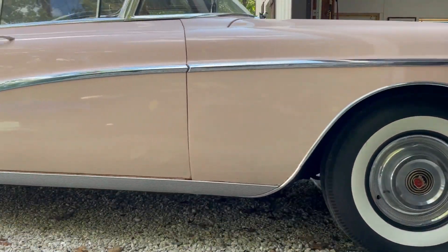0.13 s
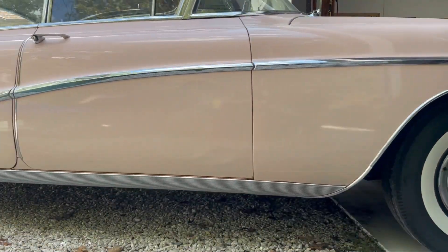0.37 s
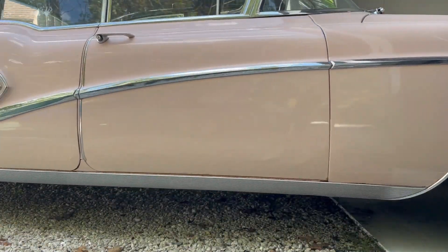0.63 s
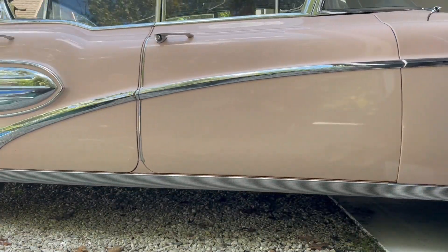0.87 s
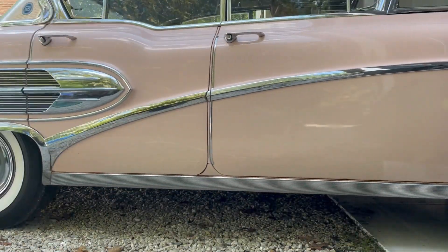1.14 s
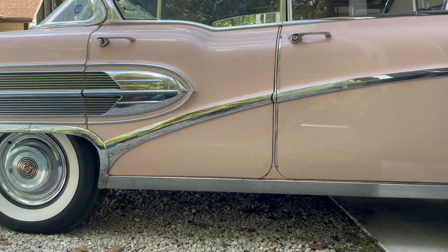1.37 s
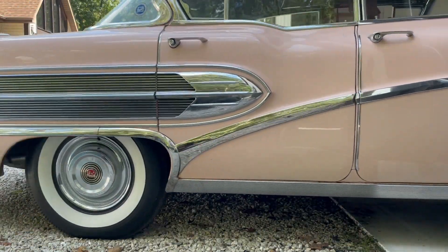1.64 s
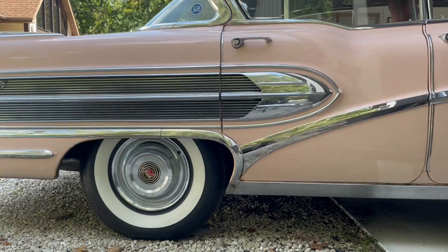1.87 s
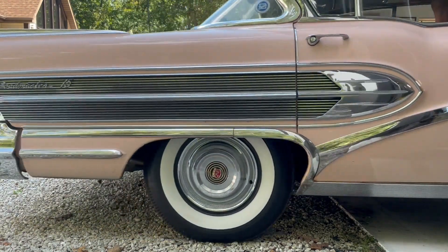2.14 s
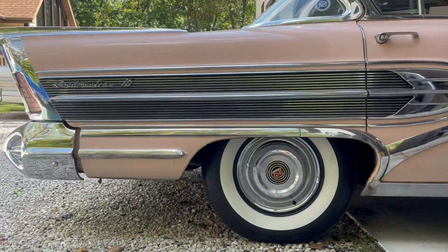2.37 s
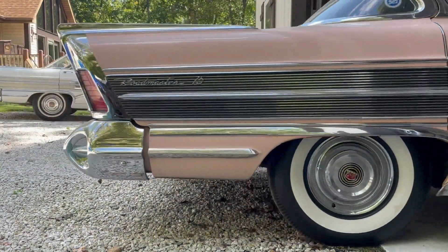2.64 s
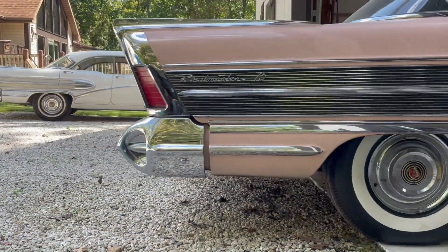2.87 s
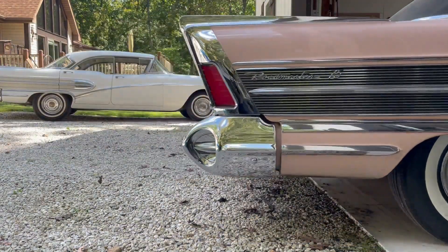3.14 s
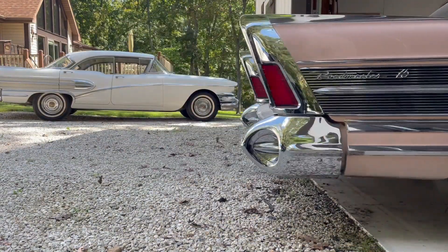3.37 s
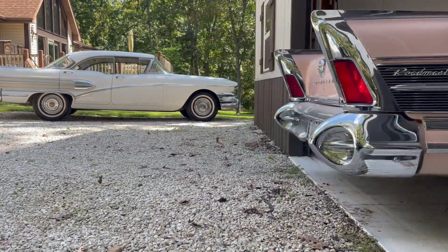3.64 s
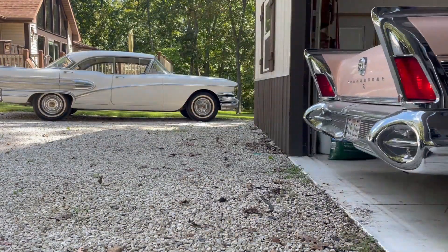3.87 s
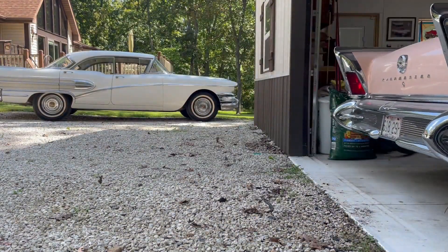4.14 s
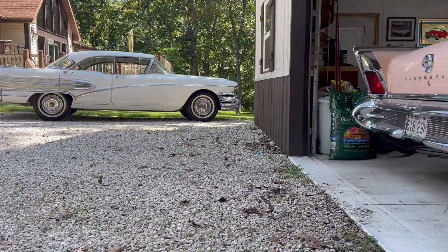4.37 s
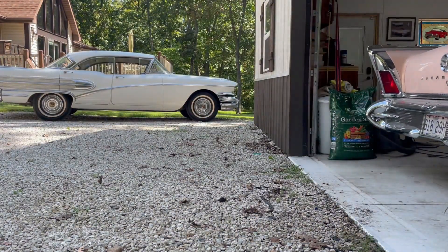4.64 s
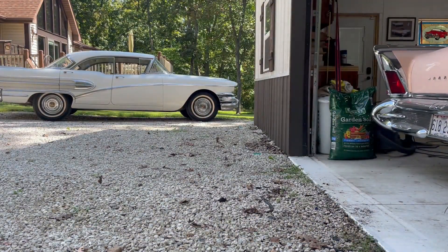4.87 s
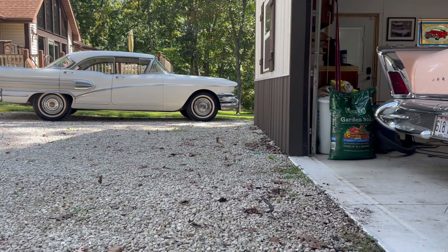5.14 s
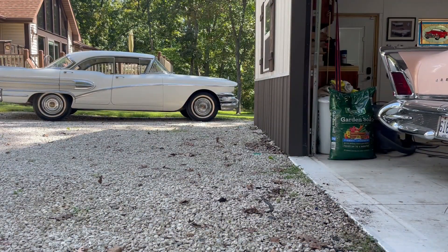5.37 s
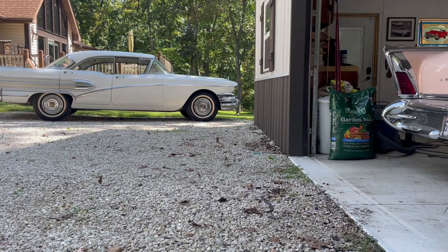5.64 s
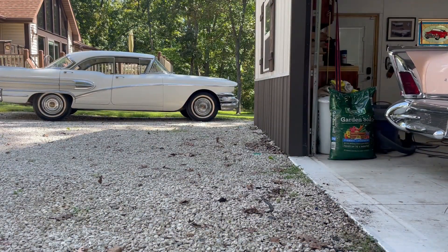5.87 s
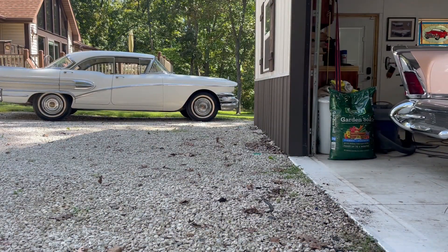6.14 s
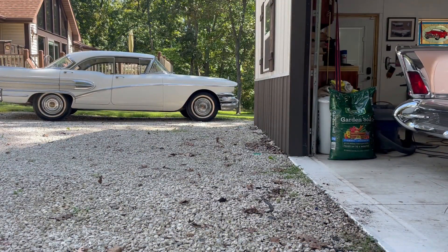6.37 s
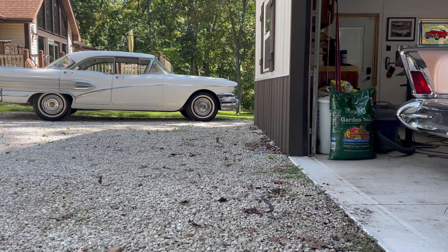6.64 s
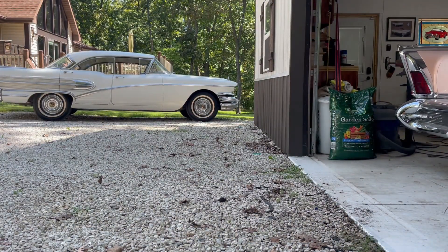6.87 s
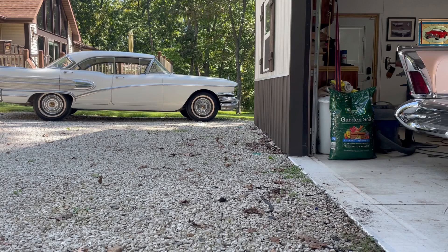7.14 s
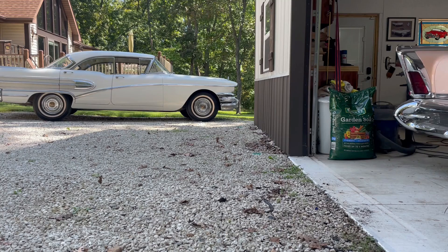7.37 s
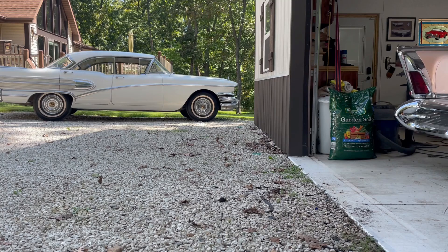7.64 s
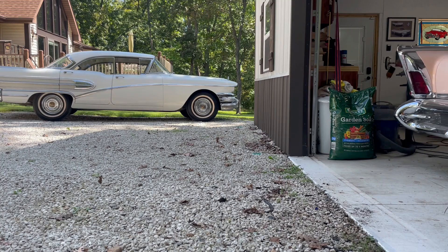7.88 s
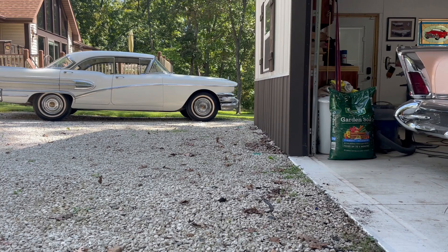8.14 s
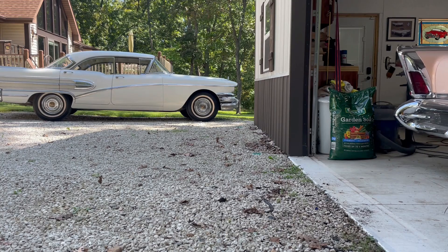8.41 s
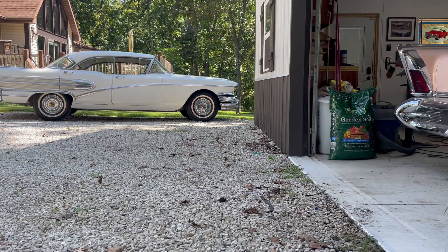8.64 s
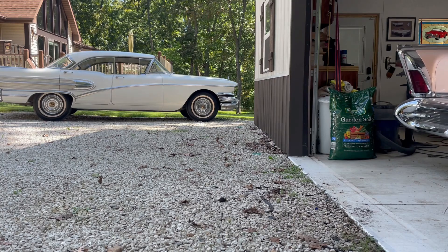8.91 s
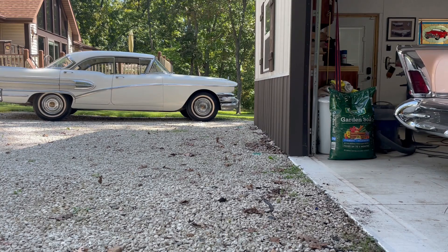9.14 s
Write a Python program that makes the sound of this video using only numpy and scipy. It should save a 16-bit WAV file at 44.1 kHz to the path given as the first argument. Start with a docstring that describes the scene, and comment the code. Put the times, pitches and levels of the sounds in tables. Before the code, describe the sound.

From 0 s a large V8 is already running very close, creeping over gravel: a deep, lumpy throb near 40 pulses a second, with a loping eight-beat unevenness, low pipe ring and broad rushing air. Around 0.5-1.5 s a leaking joint blows and spits in soft puffs, while faint crunch and small stone knocks tick under the tyres, the clearest near 1.6 s. From 2.5 to 3.5 s the tail passes; the engine-bay rush drops, the low exhaust throb swells, and short breathy chirps begin. A little more gravel crunches and knocks at 3.4-4.0 s, then fades. From 4 s the car idles in the garage, a steady heavy rumble with light exhaust hiss and irregular high whistling chirps, the speed hunting slightly. Around 7.2-8 s the revs lift a little and hold, fuller and smoother, to the end at about 9.3 s. Close stereo, short dense reflections.

```python
"""A gravel drive before an open garage: a large V8 creeps close past the microphone and idles inside.
Low orders of the firing rate throb, the two banks beat unevenly through silencer resonances, the tailpipe rings.
A leak adds breathy whistles and short chirps as the cylinders fire; a manifold joint blows and spits.
Shaped noise is the engine-bay rush and short decaying tones are the stones; both fade as the tail draws away."""
import sys
import numpy as np
from scipy import signal
from scipy.fft import rfft, irfft, next_fast_len
from scipy.io import wavfile
from scipy.ndimage import uniform_filter1d, map_coordinates

SR = 44100
rng = np.random.default_rng(int(sys.argv[2]) if len(sys.argv) > 2 else 0)


def dump(signal):
    """Clip the signal to [-1, 1] and save it as 16-bit WAV at the path in sys.argv[1]."""
    limited = np.clip(np.atleast_2d(signal).T, -1, 1)
    pcm = np.round(limited * 32767).astype(np.int16)
    wavfile.write(sys.argv[1], SR, pcm)


def boost_factor(decibels):
    """Convert a level in decibels to a linear amplitude factor."""
    exponent = np.asarray(decibels, float) / 20
    return 10 ** exponent


N = 408807

# Engine speed as the idle hunts, stumbles and is blipped up: (time [s], rate [firings per second])
SPEED = [(0.0, 42.66), (0.21, 39.17), (0.51, 41.73), (0.8, 39.58), (1.01, 42.54), (1.19, 41.21),
         (1.44, 42.81), (1.75, 39.96), (2.2, 39.95), (2.56, 41.79), (2.75, 41.03), (3.15, 42.6),
         (3.38, 40.11), (3.67, 43.52), (4.13, 42.28), (4.44, 43.72), (4.65, 40.54), (5.38, 42.0),
         (5.65, 41.36), (5.87, 42.76), (6.03, 41.57), (6.28, 42.47), (6.59, 40.96), (6.82, 44.2),
         (7.16, 41.87), (8.04, 46.08), (8.33, 45.06), (8.6, 46.12), (9.27, 45.62)]
# Each cylinder in firing order, relative strengths: (leak chirp [dB], puff of the rush [dB])
CYLINDER = [(-10, -7), (-2, 0), (0, 4), (-8, -3), (-2, -2), (-4, -2), (-4, -4), (-1, -4)]


def unit(x):
    """Scales to an rms of 1."""
    return x / np.sqrt(np.mean(x ** 2) + 1e-20)


def along(points, hz):
    """Reads (Hz, value) points on a log frequency axis."""
    f, v = np.transpose(points)
    return np.interp(np.log(hz + 1), np.log(f + 1), v)


def curves(rows):
    """One value per sample for each column after the time."""
    s, *cols = np.transpose(rows)
    return [np.interp(np.arange(N) / SR, s, c) for c in cols]


def filtered(x, response):
    """Multiplies the spectrum of x by a response of frequency."""
    m = next_fast_len(N + SR // 2)
    return irfft(rfft(x, m) * response(np.fft.rfftfreq(m, 1 / SR)), m)[..., :N]


def resonant(x, modes):
    """Sends x through parallel (Hz, width Hz, dB) resonances of alternating sign."""
    def response(f):
        total = 0
        for k, (centre, width, db) in enumerate(modes):
            damping = 1j * f * width
            total = total + (-1) ** k * boost_factor(db) * damping / (centre * centre - f * f + damping)
        return total
    return filtered(x, response)


def burst(rise, t60):
    """A soft swell that dies away by 60 dB in t60 seconds, with its time axis."""
    t = np.arange(SR // 16) / SR
    return t, (1 - np.exp(-t / rise)) * boost_factor(-60 * t / t60)


def crank():
    """Firings counted so far: the running sum of the engine speed."""
    return np.cumsum(curves(SPEED)[0]) / SR


def firings(late, sizes, scatter_db):
    """One spike per firing, late by a share of a stroke, sized by cylinder, no two alike."""
    turn = crank() - late
    at = np.flatnonzero(np.diff(np.floor(turn))) + 1
    cylinder = np.floor(turn[at]).astype(int) % 8
    spikes = np.zeros(N)
    spikes[at] = np.asarray(sizes)[cylinder] * boost_factor(scatter_db * rng.standard_normal(len(at)))
    return spikes


def scattered(x):
    """What ground, car body and garage walls send back: a short dense tail of decaying noise."""
    t = np.arange(SR // 8) / SR
    tail = rng.standard_normal(len(t)) * boost_factor(-60 * t / 0.066)
    echo = signal.fftconvolve(x, tail / np.linalg.norm(tail))[:N]
    return filtered(echo, lambda hz: 1 / (1 + (110 / (hz + 1)) ** 4))


def rush(spectrum, patchy_db):
    """Turbulent noise of rms 1, with patches of random gain in time and pitch."""
    z = signal.stft(rng.standard_normal(N), nperseg=512)[2]
    field = uniform_filter1d(rng.standard_normal(z.shape), size=8, axis=0)
    field = uniform_filter1d(field, size=4, axis=1)
    noise = signal.istft(z * boost_factor(patchy_db * unit(field)), nperseg=512)[1][:N]
    return unit(filtered(noise, lambda hz: boost_factor(along(spectrum, hz))))


def gas(beside_db, behind_db):
    """Two unrelated streams of rushing gas and fan air; the treble puffs with every firing."""
    # Shapes of the rush, beside the body and behind the tail: (frequency [Hz], relative density [dB per Hz])
    beside = [(30, -63), (40, 2.5), (60, -5.5), (100, -2), (150, -7.5), (250, -12.5), (450, -19.5),
              (900, -25), (1800, -32), (3000, -37), (5000, -36.5), (7000, -37), (8500, -43), (10500, -41),
              (13500, -45.5), (14500, -88)]
    behind = [(30, -57), (40, -0.5), (60, -3.5), (100, -7), (150, -13), (250, -9.5), (450, -18.5),
              (900, -22.5), (1800, -27.5), (3000, -32.5), (5000, -36), (7000, -34.5), (8500, -36.5),
              (10500, -41.5), (13500, -53), (14500, -67)]
    # Air spaces under the car that colour the rush: (frequency [Hz], width [Hz], level [dB])
    hollow = [(423.3, 38, -3), (699, 33, -4.5)]
    puff_sizes = boost_factor(np.transpose(CYLINDER)[1])
    puffs = signal.fftconvolve(firings(.45, puff_sizes, scatter_db=1.8), burst(.004, .06)[1])[:N]
    streams = []
    for _ in range(2):
        near = boost_factor(beside_db) * rush(beside, patchy_db=2.5)
        far = boost_factor(behind_db) * rush(behind, patchy_db=1.42)
        streams.append(near + far)
    air = np.array(streams)
    air = air + sum(resonant(air, [mode]) for mode in hollow)
    treble = filtered(air, lambda hz: 1 / (1 + (1600 / (hz + 1)) ** 2))
    return air - treble + treble * unit(2.17 + unit(puffs))


def rolling():
    """Level of the crunch: full while a wheel is on gravel, rising before and fading after."""
    # Wheels rolling on gravel: (start [s], end [s], level [dB])
    wheels = [(.2, 2.6, -49), (3.62, 4, -37.5)]
    fade_db_per_s = 16
    t = np.arange(N) / SR
    levels = []
    for start, end, db in wheels:
        time_away = np.maximum(0, np.maximum(start - t, t - end))
        levels.append(db - fade_db_per_s * time_away)
    return np.max(levels, axis=0)


def stones(crunch_db, count=6000):
    """Gravel shifts under the tyres: short grains, each of its own pitch; a few stones pop out with a knock."""
    # Stones under the tyres: (time [s], level before a common lift [dB], pitch [Hz], crack [0-1])
    knocks = [(0.222, -16, 740, 0.4), (0.283, -20, 740, 0.3), (0.635, -26, 711, 0.4),
              (0.838, -17, 1870, 0.1), (1.169, -18, 816, 0), (1.206, -19, 890, 0.3),
              (1.422, -16.5, 825, 0.2), (1.46, -23, 845, 0.5), (1.602, -10, 884, 0.83),
              (3.397, -32, 1650, 0.3), (3.633, -22, 830, 1), (3.657, -24, 1240, 0.5),
              (4.025, -22, 910, 0.4)]
    when, pitch = rng.random(count), rng.standard_normal(count)
    size = np.minimum(rng.exponential(size=count), 3)
    hz = np.clip(1700 * np.exp(.75 * pitch), 500, 12000)[:, None]
    life = np.arange(700) / SR
    envelope = boost_factor(4.0 * size[:, None] - 60 * life * hz / 22) * (1 - np.exp(-life * hz / 1.5))
    grains = envelope * np.sin(2 * np.pi * hz * life)
    places = (when * N).astype(int)[:, None] + np.arange(700)
    crunch = np.bincount(places.ravel(), grains.ravel(), N + SR)[:N]

    t, swell = burst(0.002, 0.021)
    pops = np.zeros(N + SR)
    for s, db, hz, crack in knocks:
        # the crack is inharmonic overtones and a breath of noise
        overtones = 1.03 * rng.standard_normal(len(t)) * swell
        for ratio, gain in [(1.21, 1), (1.5, 0.78), (1.87, 0.36)]:
            overtones = overtones + gain * np.sin(2 * np.pi * ratio * hz * t)
        knock = np.sin(2 * np.pi * hz * t) + np.clip(crack, 0, 1) * overtones
        pops[round(s * SR):][:len(t)] += boost_factor(db + 4.5) * swell * knock
    return boost_factor(crunch_db) * unit(crunch) + pops[:N]


def manifold():
    """The cylinders blow unequally through a manifold joint: a soft suck of air with a spit of hiss."""
    # Blow of each cylinder at the joint, in firing order: relative strength [dB]
    blow_sizes = [-5, -20, -14, 0, -18, -16, -10, -16]
    # The joint as heard at the microphone: (time [s], blow [dB], delay behind the firing [strokes])
    front = [(0, -32.5, 0.92), (.5, -25, 0.98), (1.0, -23.5, .95), (1.5, -32, 1.14), (2.0, -31, 1.42),
             (2.5, -42, 1.7), (3.0, -36.5, 1.72), (9.27, -61, 1.84)]
    blow_db, late = curves(front)
    blows = firings(late, boost_factor(blow_sizes), scatter_db=1.5)
    thump = -resonant(blows, [(122, 71, 0)])
    thump = filtered(thump, lambda hz: 1 / (1 + (60 / (hz + 1)) ** 6) / (1 + (hz / 200) ** 4))
    hiss = resonant(rng.standard_normal(N), [(1990, 250, 15.5), (6160, 3800, 4.5), (9440, 2500, 10.5)])
    spit = signal.fftconvolve(blows, burst(0.006, 0.042)[1])[:N] * hiss
    return boost_factor(blow_db) * (unit(thump) + boost_factor(-17.0) * unit(spit))


def leak():
    """Gas whistles briefly and breathily through a crack as cylinders fire, each tone of wandering strength."""
    # Whistle tones of the crack: (frequency [Hz], width [Hz], relative level [dB])
    tones = [(1620, 80, -6), (1940, 95, -6), (2250, 120, -7), (3140, 170, 0), (3920, 260, -2),
             (4740, 300, 1), (5500, 300, -7)]
    # Strength of the whistles: (time [s], top whistle [dB], lower whistles against it [dB])
    overblow = [(1.2, -72, -5), (2.6, -59, 0), (3.3, -57, 2), (4.0, -51, 0), (5.0, -48, -2.5),
                (5.7, -48.5, -2), (6.0, -54, 3), (6.6, -49.5, -2), (9.27, -49.5, -2)]
    # Loudest chirps: (time [s], low whistle [dB], high whistle [dB])
    chirps = [(2.699, -24, -19), (2.8924, -21.5, -25), (3.275, -23, -22), (3.3243, -23, -31),
              (3.444, -27, -18.5), (4.0045, -27, -19), (4.027, -17, -18), (4.193, -39, -16),
              (4.2164, -23, -18), (4.377, -34, -22), (4.4293, -18, -46), (4.4987, -24, -45),
              (4.591, -28, -18.5), (4.938, -21, -38), (5.7776, -20, -26), (6.0144, -30, -26),
              (6.0377, -18, -37), (6.086, -17, -42), (6.156, -22, -23), (6.3944, -22, -40),
              (6.5893, -32.5, -19.5), (7.0283, -23, -28), (7.1, -20, -29), (7.357, -19, -23),
              (7.541, -40, -19), (7.899, -27, -21), (8.0739, -35, -25), (8.359, -35, -21),
              (8.4267, -25, -23), (9.0307, -38, -24), (9.123, -40, -23)]
    wander_db, wander_rate = 2, 10  # depth [dB], changes a second
    low_hz, high_hz = tones[3][0], tones[5][0]
    t, swell = burst(.003, .045)
    top_db, lower_db = curves(overblow)
    sizes = boost_factor(np.transpose(CYLINDER)[0])
    steady = 0
    for hz, width, db in tones:
        narrow = resonant(rng.standard_normal(N), [(hz, width, 0)])
        breathy = unit(resonant(narrow, [(hz, 2 * width, 0)]))
        gusts = .3 + unit(signal.fftconvolve(firings(.5, sizes, scatter_db=2.5), swell)[:N])
        targets = rng.standard_normal(int(N * wander_rate / SR) + 4)
        wander = map_coordinates(targets, [np.arange(N) * wander_rate / SR])
        level_db = wander_db * wander + db + top_db + lower_db * (hz < high_hz)
        steady = steady + boost_factor(level_db) * breathy * gusts

    loud = np.zeros(N + SR)
    t, swell = burst(0.0028, 0.027)
    for s, low_db, high_db in chirps:
        bend = 1 + 0.014 * rng.standard_normal()  # each chirp a little off pitch
        low = np.sin(2 * np.pi * bend * low_hz * t)
        high = np.sin(2 * np.pi * bend * high_hz * t)
        loud[round(s * SR):][:len(t)] += swell * (boost_factor(low_db) * low + boost_factor(high_db) * high)
    return steady + loud[:N]


def tailpipe(ring_db, pipe_hz):
    """One cylinder restarts the pipe's ring each cycle; the others feed or damp it."""
    # Ring stroke by stroke after the cylinder that restarts it: relative level [dB]
    stroke_db = [6, -3.5, 0, 0, -1.5, -5.5, -9.5, -9]
    turn = crank() - 2.7
    cycle = np.floor(turn / 8).astype(int) + 1
    start = np.maximum.accumulate(np.where(np.diff(cycle, prepend=0) > 0, np.arange(N), 0))
    luck = rng.standard_normal((cycle[-1] + 1, 8))
    sizes = (np.array(stroke_db) + 2.1 * luck).ravel()
    size_db = np.interp(turn + 8, np.arange(luck.size), sizes)
    hz = pipe_hz * (1 + 0.007 * luck[cycle, 0])
    ring = boost_factor(size_db) * np.sin(2 * np.pi * hz * (np.arange(N) - start) / SR)
    return boost_factor(ring_db) * unit(resonant(ring, [(pipe_hz, 70, 0)]))


def banks(beat_db):
    """The banks push with opposite bias, so the silencer lopes once every eight firings."""
    # Bias of each cylinder on the silencer, in firing order: push [signed, relative]
    push = [-1.63, 0.75, 1.56, -1.3, 0.98, -0.32, -1.25, 0.48]
    # Resonances of the silencer: (frequency [Hz], width [Hz], relative level [dB])
    silencer = [(53.5, 18, -5.5), (74, 24.6, 0), (102.4, 17.5, -5), (138.5, 20, -7.5)]
    beat = resonant(firings(0.29, push, scatter_db=2.5), silencer)
    beat = filtered(beat, lambda hz: 1 / (1 + (44 / (hz + 1)) ** 12) / (1 + (hz / 170) ** 6))
    return boost_factor(beat_db) * unit(beat)


def throb():
    """The low orders of the firing rate swell with effort; the cylinders lope most when the engine labours least."""
    # Pipes at the microphone at idle effort: (time [s], at the firing rate [dB], at twice the rate [dB])
    orders = [(0, -18, -21.5), (1.3, -17, -19.5), (1.9, -21, -22), (2.5, -15.5, -24), (3, -12.5, -18.5),
              (4.45, -14.5, -18.5), (6.9, -16, -19.5), (9.27, -15.5, -22)]
    # Lope of each cylinder before its depth is applied: (at the firing rate [dB], at twice the rate [dB])
    lope_table = [(0, -3.5), (1.5, -5.5), (-0.2, -2.1), (-4.5, -3), (3, -2.6), (2.1, 0), (3.5, -2.5),
                  (-0.2, 1.5)]
    # Chance change from firing to firing: (time [s], standard deviation at the firing rate [dB])
    uneven = [(0, 2.5), (2.3, 2.5), (3.2, .5), (9.27, 1)]
    idle_rate, effort_span = 42, 2.34  # firings per second; the span all but saturates the effort
    first_gain_db, second_gain_db = 4, 5.5  # throb gained at full effort
    lope_idle, lope_evens = 0.8, 0.37  # depth of the lope at idle, depth lost at full effort
    first_db, second_db = curves(orders)
    turn = crank()
    effort = np.tanh((curves(SPEED)[0] - idle_rate) / effort_span)
    count = np.arange(int(turn[-1]) + 2)
    depth = lope_idle - lope_evens * effort
    lope = [np.interp(turn, count, np.array(lope_table)[count % 8, k]) * depth for k in range(2)]
    spread_db = curves(uneven)[0]
    luck = [np.interp(turn, count, draw) * spread_db for draw in rng.standard_normal((len(count), 2)).T]
    first_db = first_db + first_gain_db * effort + lope[0] + luck[0]
    second_db = second_db + second_gain_db * effort + lope[1] + 1.4 * luck[1]
    angle = 2 * np.pi * turn
    first = boost_factor(first_db) * np.cos(angle - 2.85)
    second = boost_factor(second_db) * np.cos(2 * angle + 2.6)
    third = boost_factor(second_db / 2 - 23.5) * np.cos(3 * angle - 1.5)
    return np.sqrt(2) * (first + second + third)


def scene():
    """Direct sound is shared by both ports, scattered sound reaches them in opposite sense."""
    # Car as it passes: (time [s], bank beat [dB], pipe ring [dB], rush beside body [dB], rush behind tail [dB])
    load = [(0, -16, -27, -21, -47), (.5, -22, -28, -22.5, -33), (1.3, -26.5, -28, -20, -42),
            (2.0, -20.5, -30.5, -22.5, -28), (2.9, -20.5, -38.5, -29.5, -29), (3.7, -20.5, -35.5, -36, -28),
            (4.3, -26.5, -30, -43, -29), (9.27, -25, -31.5, -56, -29)]
    # Likeness of the two ports: (frequency [Hz], left-right likeness [0-1])
    alike = [(60, .995), (200, .96), (400, .9), (700, .76), (1500, .76), (3000, .66), (6000, .8),
             (8300, .97), (11000, .92), (13000, .8)]
    # Balance as the car moves: (time [s], left over right [dB])
    sweep = [(0, -.8), (2, -.8), (3.5, 0), (9.27, 0)]
    beat_db, ring_db, beside_db, behind_db = curves(load)
    car = banks(beat_db) + tailpipe(ring_db, pipe_hz=226.1) + manifold() + leak() + stones(rolling())
    pair = np.array([car, scattered(car)]) + gas(beside_db, behind_db)

    def shares(hz):
        """Gains of the shared and opposed sound that give the wanted likeness."""
        turn = np.arccos(np.clip(along(alike, hz), -1, 1)) / 2
        return np.array([np.cos(turn), np.sin(turn)])

    mid, side = filtered(pair, shares)
    mid = mid + throb()
    return np.array([mid + side, mid - side]) * boost_factor(np.outer([.5, -.5], curves(sweep)[0]))


def low_pass(x):
    """Removes everything above the highest recorded frequency."""
    return signal.sosfilt(signal.butter(12, 14190, fs=SR, output="sos"), x)


def record(dry):
    """Two microphone ports a little apart: each has its own colour and delay, and both lose the deepest bass."""
    # Colour of the ports: (frequency [Hz], left over right [dB])
    tilt = [(60, -0.5), (110, -1.0), (200, -1.0), (370, -0.5), (670, -1.5), (1220, -1.5), (2230, 1.5),
            (4070, 4.0), (7440, 0.0), (13600, 0.0)]
    # Phase between the ports: (frequency [Hz], lead of the left [rad])
    lead = [(0, 0), (1640, -1.2), (3270, 0.5), (5080, 0.7), (7670, -2.5), (11000, -6.1), (12400, -6.3),
            (13800, -9.0)]
    mic_low_hz = 33
    half = np.array([[.5], [-.5]])

    def response(hz):
        colour = boost_factor(half * along(tilt, hz))
        low_cut = 1 / (1 + (mic_low_hz / (hz + 1)) ** 8)
        return colour * low_cut * np.exp(1j * half * np.interp(hz, *np.transpose(lead)))

    return low_pass(filtered(dry, response))


dry = scene()
out = record(dry)
dump(out)
```